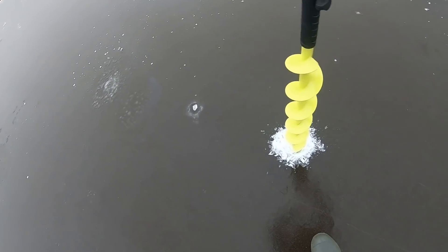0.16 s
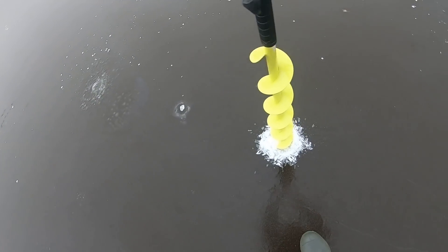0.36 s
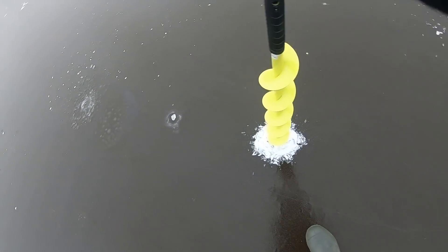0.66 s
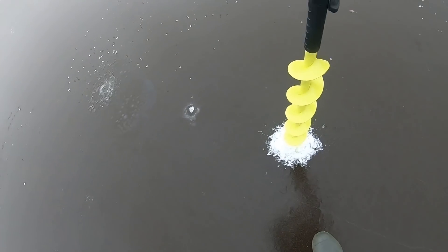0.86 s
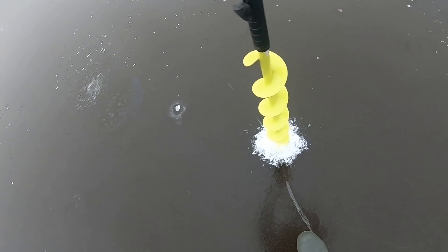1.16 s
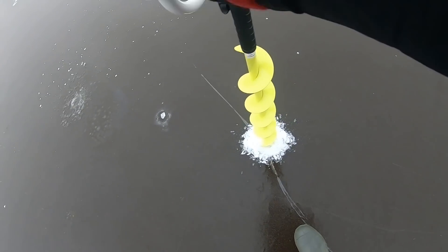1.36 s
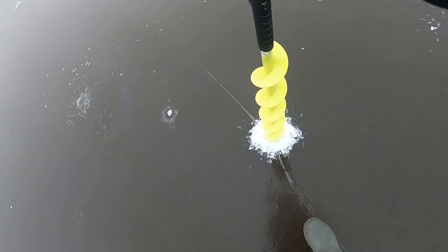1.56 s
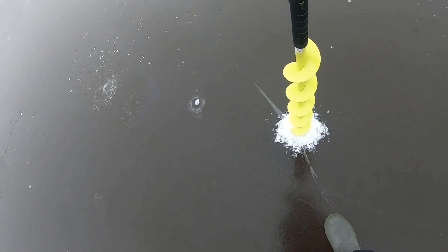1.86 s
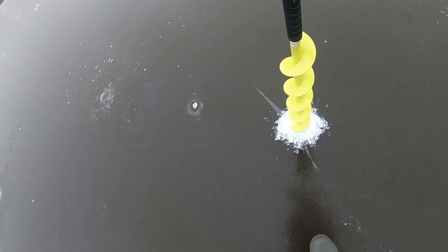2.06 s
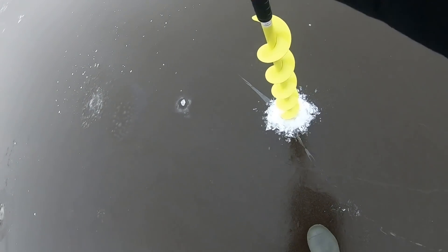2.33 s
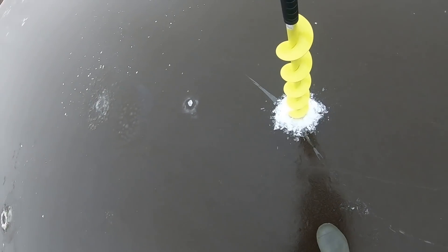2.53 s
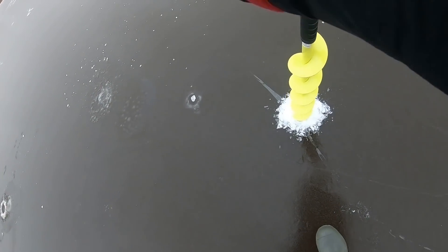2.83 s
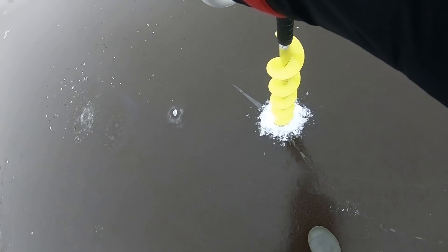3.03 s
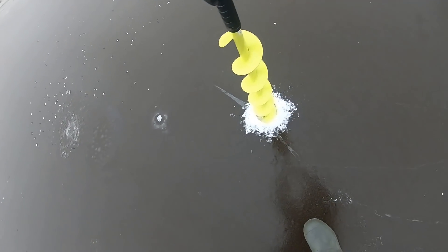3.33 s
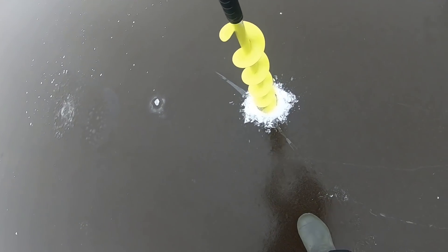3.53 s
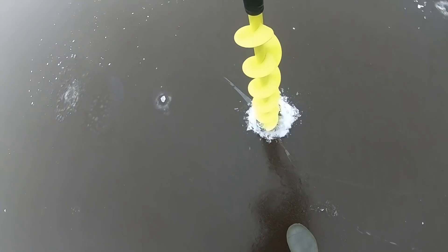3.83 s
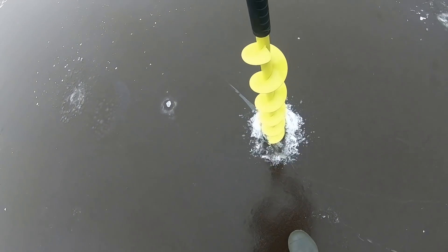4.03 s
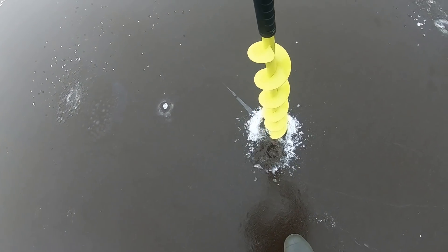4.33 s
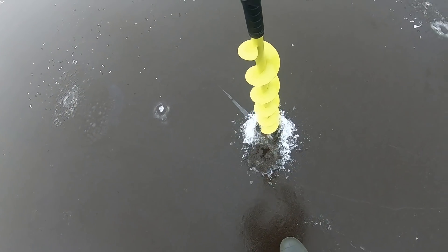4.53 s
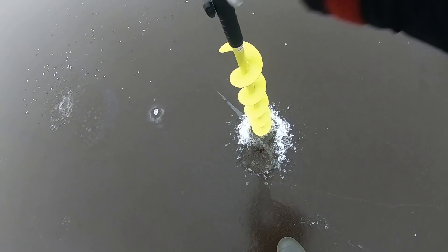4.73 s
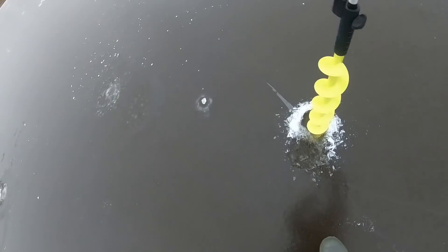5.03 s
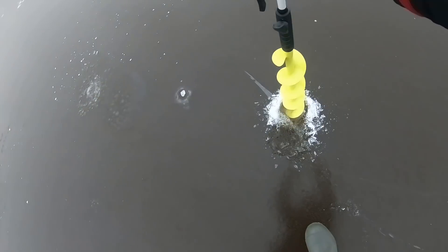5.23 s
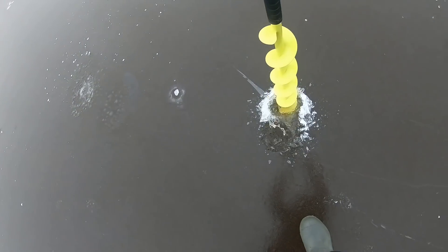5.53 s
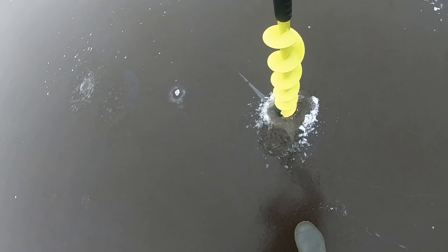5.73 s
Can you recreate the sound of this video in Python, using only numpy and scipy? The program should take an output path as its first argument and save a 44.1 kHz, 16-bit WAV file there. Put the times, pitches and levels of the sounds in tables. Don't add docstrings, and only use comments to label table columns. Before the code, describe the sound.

Steel auger blades scrape and shave ice in a steady gritty grind that pulses gently with the crank, then stops short. The tool rocks and knocks in the hole: chips crack, crunch and tick, with brief metallic rings. Activity thins around four seconds, then builds to a busy, loud finish. Dry open outdoor place, no echo, low clothing rumble and soft thumps, very faint hiss, one enclosed microphone nearby.

```python
import sys
import numpy as np
from scipy import signal
from scipy.io import wavfile
from scipy.ndimage import uniform_filter1d

SR = 44100
rng = np.random.default_rng(int(sys.argv[2]) if len(sys.argv) > 2 else 0)


def natural_amplitude(level_db):
    exponent = np.asarray(level_db, float) / 20
    return 10 ** exponent


def log_audio(samples):
    frames = np.atleast_2d(samples).T
    limited = np.clip(frames, -1, 1)
    pcm = np.round(limited * 32767).astype(np.int16)
    wavfile.write(sys.argv[1], SR, pcm)


N = 259296

# t/s, pressure as sheet level/dB, singing blade level/dB
DRILLING = [
    (0.02, -24.5, -38),
    (0.2, -28, -45.5),
    (0.4, -24, -48),
    (0.55, -25, -46.5),
    (0.85, -25, -35.5),
    (1.03, -24.5, -35),
    (1.15, -24.5, -49),
    (1.36, -26, -50),
    (1.5, -29.5, -38),
]
# t/s, peak/dB, chip pitch f/Hz, steel share/dB, steel pitch f/Hz
SNAPS = [(0.072, -28, 980, -23, 2660), (0.473, -10.5, 1240, -5, 5330), (0.614, -8, 980, -10, 2860),
         (0.814, -12, 1420, -40, 2580), (0.984, -13, 875, 0, 3200), (1.198, -7.5, 1130, -12, 4720),
         (1.285, -13, 1500, -4, 4500), (1.695, -16.5, 1070, -23, 6030), (2.483, -12, 1970, 4.5, 6100),
         (2.576, -21.5, 1500, -4.5, 2870), (2.757, -25, 880, -5, 6000), (2.893, -15.5, 1500, -1.5, 6000),
         (3.172, -22, 2000, -16, 3000), (3.545, -35.5, 900, 4, 5500), (3.662, -15, 2250, 2, 4360),
         (4.211, -41, 590, -9, 3870), (4.465, -49.5, 607, 10, 5630), (4.933, -14, 790, -16, 2520),
         (5.25, -23.5, 1560, -8, 3770), (5.645, -18.5, 1620, -1.5, 2750)]
CRUNCHES = [(1.609, -24, 603, -9.5, 4280), (1.651, -25.5, 674, -6, 2700), (1.639, -28, 1670, -12, 4500),
            (1.928, -34, 1150, -29, 2900), (2.017, -22.5, 1650, -14, 3150), (2.594, -18, 1233, -8.5, 2570),
            (2.682, -34, 1500, 8.5, 5540), (2.916, -13, 1560, -22, 3630), (3.038, -13, 1346, -6, 3740),
            (3.1, -22, 1170, -15, 5830), (3.493, -33.5, 820, -6.5, 5500), (3.602, -36, 600, 3, 2300),
            (4.44, -34, 1810, -13, 5700), (4.665, -19, 1500, -15, 2590), (4.888, -12, 1023, -12, 2560),
            (4.919, -31, 746, 10.5, 2830), (5.163, -12.5, 1190, -7.5, 4500), (5.333, -8, 1780, -10.5, 4370),
            (5.389, -18, 1450, -7.5, 2570), (5.427, -22.5, 1730, -10, 4500),
            (5.527, -8.5, 1570, -8.5, 4770), (5.594, -25, 1500, -26, 2680), (5.685, -27.5, 860, 7.5, 4500),
            (5.795, -12.5, 1970, -3.5, 3180)]
CRUSHES = [(1.708, -14.5, 2134, -4.5, 2870), (1.953, -21, 910, -17, 3330), (1.979, -21, 1044, -6, 6200),
           (2.385, -22.5, 696, -14, 2820), (2.441, -21.5, 1055, -23, 2760), (2.48, -11.5, 1770, -10, 3070),
           (2.84, -37, 620, 1, 5800), (2.938, -21.5, 1560, -10, 4030), (3.07, -28.5, 1110, -4, 6110),
           (3.308, -24, 1210, -10.5, 2420), (3.711, -13.5, 2090, -1.5, 4280),
           (4.588, -31, 1980, -4.5, 6100), (4.721, -29.5, 1230, -3, 4200), (4.752, -14, 774, -34, 4660),
           (4.835, -21, 2160, -13, 2620), (5.047, -21, 1286, -22, 2820), (5.081, -22.5, 1676, -7, 2760),
           (5.15, -16.5, 1910, -8, 6010), (5.184, -21, 1040, -2.5, 2450), (5.316, -27, 1510, 1, 6060),
           (5.449, -8.5, 864, -12.5, 2420), (5.617, -16.5, 1650, -11, 5500), (5.705, -12.5, 1140, -4, 4250),
           (5.769, -13.5, 1420, -0.5, 5030)]
# t/s, peak/dB, pitch f/Hz
TICKS = [(1.545, -28, 703), (1.578, -34, 716), (1.696, -17, 1150), (1.714, -15, 2180), (1.766, -36, 805),
         (1.796, -43, 818), (1.952, -26, 896), (1.979, -26, 980), (2.404, -26, 1250), (2.441, -29, 1220),
         (2.456, -19, 1000), (2.492, -16.5, 2680), (2.502, -17, 2660), (2.577, -25, 1520),
         (2.595, -21, 1160), (2.683, -22, 5500), (2.711, -33, 1170), (2.76, -26, 861), (2.792, -40, 818),
         (2.834, -27, 6370), (2.888, -19, 6030), (2.893, -8.5, 5650), (2.917, -17, 1580),
         (2.945, -22, 1560), (3.019, -29.5, 2130), (3.039, -15, 1250), (3.046, -26, 1230),
         (3.076, -29, 1130), (3.601, -34, 1820), (3.679, -19, 1020), (3.699, -17, 4350), (4.749, -29, 727),
         (4.762, -21, 1470), (4.834, -22, 2130), (4.921, -11, 2840), (5.315, -25, 1460), (5.335, -14, 2030),
         (5.393, -24, 1460), (5.449, -16.5, 870), (5.461, -13, 780), (5.471, -27, 807), (5.536, -4, 1590),
         (5.625, -23, 1570), (5.652, -18, 1610), (5.685, -24, 4530), (5.715, -15, 4590), (5.727, -15, 1200),
         (5.768, -17, 1400), (5.785, -11, 861), (5.802, -25, 1030)]
# t/s, f/Hz, level/dB, length/s, glide/octaves
PINGS = [(1.7, 900, -38, 0.004, -0.16), (1.579, 900, -35.5, 0.0036, -0.42),
         (1.765, 944, -38, 0.0049, -0.53), (1.863, 890, -39, 0.0026, -0.3),
         (1.975, 1014, -26.5, 0.00607, -1), (2.482, 5460, -24, 0.012, -0.0075),
         (5.795, 5440, -33.5, 0.0091, .001), (2.479, 2680, -23, 0.016, -.005),
         (2.803, 2150, -54.5, 0.031, .01), (3.724, 2150, -27.5, 0.013, -0.048),
         (3.716, 1490, -29.5, 0.01, -0.044), (4.357, 390, -42, 0.0056, -0.31),
         (5.6, 1200, -47, 0.0336, 0.37), (5.358, 1325, -35, 0.0085, 0.018),
         (5.455, 710, -34.5, 0.0125, -0.17), (5.541, 645, -25.5, 0.0088, 0.16),
         (5.608, 1400, -30.5, 0.025, 0.033), (5.706, 1048, -31.5, 0.042, 0.64),
         (5.787, 820, -28.5, 0.01, 0.1), (5.335, 1600, -28.5, 0.0088, .001),
         (5.536, 2900, -27, 0.0074, .001), (5.801, 3450, -35, 0.015, -.03),
         (5.534, 5000, -27.5, 0.007, .001), (5.533, 1600, -24, 0.0063, -0.028),
         (5.395, 2700, -42, .012, .001), (5.59, 1520, -38, 0.017, .02), (2.63, 2500, -47, .012, 0.056),
         (2.745, 5900, -38, .008, 0.31), (2.49, 7500, -41, 0.0066, 0.34), (2.485, 1900, -33, 0.01, .001),
         (5.713, 4500, -31, 0.0045, .001), (2.474, 5450, -30, 0.0068, .001)]
# t/s, peak/dB, bright above peak/dB, dust above peak/dB, slide time/s
SLIDES = [(1.515, -33.5, -6.5, -23, 0.031), (1.678, -41, -3.5, -17, 0.051), (1.97, -44, -6.5, -26, 0.074),
          (2.08, -49, 1.5, -13, 0.1), (2.256, -45.5, -2.5, -20, 0.08), (2.461, -35, 1.5, -37, 0.036),
          (2.6, -41, -2, -21, 0.078), (2.73, -42, 0, -15, 0.056), (2.85, -47, 1, -10, 0.032),
          (2.916, -43.5, 9, -5, 0.033), (3.08, -44.5, 2.5, -18, 0.046), (3.17, -45.5, -1, -14, 0.07),
          (3.55, -55.5, -0.5, -12, 0.44), (3.674, -36, -2.5, -32, 0.065), (3.9, -54.5, -1, -7.5, 0.24),
          (4.07, -61, 12, -5, 0.063), (4.41, -58.5, 1, -31, 0.052), (4.63, -52.5, 1, -20, 0.053),
          (4.86, -37.5, -0.5, -22, 0.13), (4.98, -49, -4, -11, 0.15), (5.18, -43.5, -5, -39, 0.079),
          (5.6, -43.5, 0, -21, 0.28), (5.74, -37, -10, -50, 0.16)]
# t/s, deep swell/dB, firm part above it/dB, swell time/s
RUSTLES = [(0.0, -24, -1, 0.015), (0.15, -39, -6, 0.18), (0.36, -36.5, -2, 0.1), (0.62, -56.5, 16.5, 0.75),
           (0.86, -37, -0.5, 0.099), (1.25, -47, 9, 0.32), (1.45, -42, 3, 0.034), (1.78, -38, -8, 0.1),
           (2.0, -55.5, 17, 0.082), (2.27, -53, 8.5, 0.18), (2.5, -33, -5, 0.096), (2.86, -40, 0, 0.099),
           (3.09, -37, -8, 0.054), (3.66, -40, 3.5, 0.12), (3.98, -52.5, 8, 0.11), (4.29, -38.5, -25, 0.11),
           (4.46, -38, -36, 0.037), (4.88, -42.5, 8.5, 0.15), (4.96, -41.5, -21, 0.12),
           (5.361, -42.5, -0.5, 0.028), (5.53, -53.5, 14, 0.09), (5.64, -40.5, 3.5, 0.11),
           (5.76, -44.5, 6.5, 0.089), (5.88, -38, -17, 0.042), (3.42, -41, 1, 0.072), (3.3, -54, 11.5, 0.1)]
# t/s, peak/dB, f/Hz
THUMPS = [(0.354, -30, 91.4), (0.844, -26.5, 75), (1.409, -29.5, 138), (1.751, -28.5, 76),
          (1.799, -28.5, 127), (1.962, -19.5, 226), (2.215, -34.5, 135), (2.468, -32.5, 212),
          (2.516, -33, 129), (2.836, -39, 56.5), (2.968, -35.5, 48.3), (3.06, -36, 66), (3.549, -32, 167),
          (4.239, -37.5, 59.3), (4.277, -48, 74.5), (4.432, -36, 66.4), (4.828, -29.5, 185),
          (5.433, -26, 220), (5.507, -26.5, 310), (5.622, -34, 162)]
# f/Hz, width/Hz, level/dB
ICE_MODES = [(437, 48, -8), (637, 290, -8.5), (1000, 149, 0), (1230, 104, 0.5), (1500, 146, -1),
             (1740, 240, -7.5), (2043, 310, -9)]
# f/Hz, width/Hz, level/dB
STEEL_MODES = [(2030, 35, -9), (2480, 35, -12), (2668, 26, -3), (2970, 50, -5), (3090, 25, -8),
               (4030, 200, -13), (4500, 120, -7), (4980, 40, -14), (5440, 80, -11), (5725, 35, -14),
               (5880, 45, -10), (6130, 90, -19), (6400, 60, -21), (7500, 60, -28)]
# f/Hz, density/dB
SCRAPE_SPECTRUM = [(1700, 24), (2150, -3.5), (2900, 22.5), (3500, -13), (4400, 12.5), (5200, 10),
                   (5900, 14.5), (6500, -14), (7200, -48), (8500, -57), (10500, -49), (12000, -70)]
# f/Hz, density/dB
CHIP_SPECTRUM = [(280, -36), (400, 0), (800, -1), (1450, 2), (2300, -4), (3300, -6.5), (4300, -3.5),
                 (5700, -0.5), (6600, -7), (7500, -26), (9700, -44)]
# f/Hz, density/dB
RUMBLE_SPECTRUM = [(12, -20), (20, -2), (54, -6.5), (168, -6), (353, -12.5), (528, -19.5), (700, -22.5),
                   (910, -46), (1540, -120)]

FRACTURES_PER_S = 7000
BLADE_HZ, BLADE_WIDTH_HZ = 2668, 26
TURN_S, HEAVIEST_S, TURN_DB = 0.394, 0.41, 1.5
STOP_DB_PER_S = 746
STEEL_DB, STEEL_PER_PRESSURE, STEEL_PER_BLADE = -35.5, 0.37, 0.051
BLADE_DB, DRILL_DUST_DB = 2, -61.5
SNAP_S, CRUNCH_S, CRUSH_S = 0.0062, 0.014, 0.025
FIRST_CRACK, ONSET_SHARE, FADE_POWER = 8.6, 0.71, 1.85
NEAR_MODE_DB = 15
SPLINTER_DB, SPLINTER_SLOPE, SPLINTER_DB_PER_OCTAVE = -29, 1.5, 28
TICK_S, TICK_WIDTH, TICK_BARE = 0.002, 0.19, 0.52
SWELL_ROUNDNESS = 1.25
REST_DULL_DB, REST_BRIGHT_DB, REST_DUST_DB = -70.5, -66, -92
STILL_DEEP_DB, STILL_BODY_DB = -51.5, -52.5


def grind():
    pressure_db, free_db, halt_db = drilling()
    ice_db = pressure_db + halt_db
    blade_db = BLADE_DB + free_db + halt_db
    steel_db = STEEL_DB + STEEL_PER_PRESSURE * (pressure_db + 26) + STEEL_PER_BLADE * (free_db + 36.5) + halt_db
    waves = natural_amplitude(1.3 * drift(70) + 0.2 * drift(20))
    bite, chatter, shave = fractures(spread_db=2.6, size=(3, N)) * waves
    ice_wander = [0.9 * drift(10) for mode in ICE_MODES]
    steel_wander = [2.5 * drift(10) for mode in STEEL_MODES]
    ice = body(bite, ICE_MODES, ice_wander)
    scrape = coloured(shave, SCRAPE_SPECTRUM, patchy_db=1.2)
    steel_extra = [w - 7 * (hz == BLADE_HZ) for w, (hz, *_) in zip(steel_wander, STEEL_MODES)]
    rings = played(lambda x: body(x, STEEL_MODES, steel_extra), chatter, steel_db - 0.5)
    sing_db = blade_db - 0.5 + 0.24 * steel_wander[2] + 2.8 * drift(25)
    blade = played(lambda x: resonate(resonate(x, BLADE_HZ, BLADE_WIDTH_HZ), BLADE_HZ, 120),
                   chatter[::-1], sing_db)
    return at_level(ice, ice_db + 0.7) + rings + blade + at_level(scrape, steel_db - 2.5)


def drilling():
    t = np.arange(N) / SR
    s, pressure, free = np.transpose(DRILLING)
    turn_db = TURN_DB * np.cos(2 * np.pi * (t - HEAVIEST_S) / TURN_S)
    halt_db = -STOP_DB_PER_S * (t - s[-1]).clip(0, 1)
    return np.interp(t, s, pressure) + turn_db, np.interp(t, s, free), halt_db


def breaking_ice():
    s, db, chip_hz, share_db, hz = np.transpose(SNAPS + CRUNCHES + CRUSHES)[:, :, None]
    counts = [len(SNAPS), len(CRUNCHES), len(CRUSHES)]
    length = np.repeat([SNAP_S, CRUNCH_S, CRUSH_S], counts)[:, None]
    t = np.arange(5000) / SR
    cracks = fractures(spread_db=3, size=(len(s), len(t))) + FIRST_CRACK * (t == 0)
    fade = np.exp(-(t / length) ** FADE_POWER) + 0.16 * np.exp(-t / (1.75 * length))
    bursts = cracks * fade * np.minimum(1, ONSET_SHARE + t / (0.35 * length))

    chips = np.array([resonate(b, f, 0.064 * f) for b, f in zip(bursts, chip_hz[:, 0])])
    chips = chips + 0.45 * body(bursts, ICE_MODES)
    octaves_off = np.log2(np.array(STEEL_MODES)[:, 0] / hz)
    near_db = NEAR_MODE_DB * np.exp(-(octaves_off / 0.096) ** 2)
    near_db = near_db + rng.normal(0, 3.2, near_db.shape)
    steel = body(bursts, STEEL_MODES, near_db.T[:, :, None]) + 0.057 * coloured(bursts, SCRAPE_SPECTRUM)
    splinters = band_pass(bursts * np.exp(-t / (0.52 * length)), 2, 6500, 10000)
    splinter_db = SPLINTER_SLOPE * share_db + SPLINTER_DB + SPLINTER_DB_PER_OCTAVE * np.log2(hz / 4000)
    mix = natural_amplitude(-5.5) * unit_peak(chips) + natural_amplitude(share_db) * unit_peak(steel)
    mix = mix + natural_amplitude(splinter_db) * unit_peak(splinters)
    return lay(s[:, 0], natural_amplitude(db - 3) * mix)


def ticks():
    s, db, hz = np.transpose(TICKS)[:, :, None]
    t = np.arange(1500) / SR
    cracks = (rng.standard_normal((len(s), len(t))) + 3.6 * (t == 0)) * np.exp(-t / TICK_S)
    rung = np.array([resonate(c, f, TICK_WIDTH * f) for c, f in zip(cracks, hz[:, 0])])
    bare = coloured(cracks, CHIP_SPECTRUM)
    return lay(s[:, 0], natural_amplitude(db - 5.5) * (unit_peak(rung) + TICK_BARE * unit_peak(bare)))


def pings():
    s, hz, db, length, glide = np.transpose(PINGS)[:, :, None]
    t = np.arange(6000) / SR
    glide = np.where(hz > 1800, glide.clip(-0.05, 0.01), glide)
    pitch_hz = hz * 2 ** (glide * np.minimum(t / length / 2, 1.5))
    phase = 2 * np.pi * np.cumsum(pitch_hz, axis=1) / SR
    beats = uniform_filter1d(rng.standard_normal((len(s), len(t))), size=110)
    rough = 1 + 5.4 * np.minimum(hz / 2600, 1) ** 2 * beats
    envelope = (t / length) ** 0.63 * np.exp(-t / length)
    return lay(s[:, 0], natural_amplitude(db + 8.5) * rough * np.sin(phase) * envelope)


def sliding_chips():
    dull_db, bright_db, dust_db = sliding()
    grit, chatter = fractures(spread_db=1.5, size=(2, N)) * natural_amplitude(2.3 * drift(36))
    dull, bright = split(coloured(grit, CHIP_SPECTRUM, patchy_db=3), 2300)
    rings = played(lambda x: body(x, STEEL_MODES), chatter, bright_db - 7)
    dust = band_pass(grit, 2, 6800, 9500)
    chips = at_level(dull, dull_db + 0.9) + at_level(bright, bright_db - 4.4)
    return chips + rings + at_level(dust, dust_db - 8)


def sliding():
    s, db, bright_db, dust_db, length = np.transpose(SLIDES)
    dull, bright, dust = swells(s, length, db, db + bright_db, db + dust_db)
    drill_dust = DRILL_DUST_DB + drilling()[2]
    return over(REST_DULL_DB, dull), over(REST_BRIGHT_DB, bright), over(over(REST_DUST_DB, dust), drill_dust)


def rumble():
    noise = coloured(rng.standard_normal(N), RUMBLE_SPECTRUM) * natural_amplitude(3.4 * drift(29.3))
    deep, firm = split(noise, 110)
    s, db, firm_db, length = np.transpose(RUSTLES)
    deep_db, body_db = swells(s, length, db, db + firm_db)
    deep = at_level(deep, over(STILL_DEEP_DB, deep_db) + 0.5)
    firm = at_level(firm, over(STILL_BODY_DB, body_db) + 0.5)
    s, db, hz = np.transpose(THUMPS)[:, :, None]
    t = np.arange(4000) / SR
    pushes = -natural_amplitude(db + 3.5) * np.sin(2 * np.pi * hz * t) * np.exp(-t * hz / 2.1)
    return deep + firm + lay(s[:, 0] + 0.01594, pushes)


def top_hiss(near):
    bright = band_pass(near, 2, 6800, 10000)
    bed = natural_amplitude(sliding()[2] - 9.5 + 2.2 * drift(25))
    level = bed + natural_amplitude(-15.5) * np.sqrt(uniform_filter1d(bright ** 2, size=40).clip(0))
    band = band_pass(rng.standard_normal((2, N)), 7, 11900, 15300)
    band = low_pass(band, 1, 9000)
    balance_db = np.array([[0.6], [-0.6]])
    return level * at_level(band, balance_db)


def fractures(spread_db, size):
    strength = natural_amplitude(spread_db * np.minimum(rng.exponential(1, size), 5)) * rng.standard_normal(size)
    cracks = strength * (rng.random(size) < FRACTURES_PER_S / SR)
    return cracks / rms(cracks)


def resonate(x, hz, width):
    r = np.exp(-np.pi * width / SR)
    poles = [1, -2 * r * np.cos(2 * np.pi * hz / SR), r * r]
    return signal.lfilter([(1 - r * r) / 2, 0, (r * r - 1) / 2], poles, x + 1e-18)


def body(x, modes, extra_db=None):
    if extra_db is None:
        extra_db = np.zeros(len(modes))
    out = 0
    for k, ((hz, width, db), more) in enumerate(zip(modes, extra_db)):
        out = out + (-1) ** k * natural_amplitude(db + more) * resonate(x, hz, width)
    return out


def played(filt, drive, level_db):
    return filt(drive * natural_amplitude(level_db)) / rms(filt(drive))


def coloured(x, spectrum, patchy_db=0):
    hz, db = np.transpose(spectrum)
    edges = hz[0] * 2 ** np.arange(0, np.log2(hz[-1] / hz[0]), 1 / 3)
    levels_db = np.interp(np.log(edges[:-1] * edges[1:]) / 2, np.log(hz), db)
    out = 0
    for k, (low, high, level_db) in enumerate(zip(edges, edges[1:], levels_db)):
        if patchy_db:
            level_db = level_db + patchy_db * drift(4.9)
        out = out + (-1) ** k * natural_amplitude(level_db) * band_pass(x, 2, low, high)
    return out


def drift(rate):
    r = np.exp(-40 * np.pi * rate / SR)
    slow = signal.lfilter([1], [1, -2 * r, r * r], rng.standard_normal(N // 20 + 3002))[3000:]
    return np.interp(np.arange(N) / 20, np.arange(len(slow)), slow / rms(slow))


def swells(s, length, *levels_db):
    steps = np.arange(0, N + 64, 64)
    distance = np.abs(steps / SR - s[:, None]) / length[:, None].clip(0.005)
    shape = np.exp(-2 * distance ** SWELL_ROUNDNESS)
    curves = [10 * np.log10(natural_amplitude(db) ** 2 @ shape + 1e-20) for db in levels_db]
    return [np.interp(np.arange(N), steps, curve) for curve in curves]


def over(floor_db, level_db):
    return 10 * np.log10(natural_amplitude(floor_db) ** 2 + natural_amplitude(level_db) ** 2)


def lay(times, sounds):
    out = np.zeros(N + len(sounds[0]))
    for s, sound in zip(times, sounds):
        out[round(s * SR):][:len(sound)] += sound
    return out[:N]


def rms(x):
    return np.sqrt(np.mean(x ** 2) + 1e-20)


def at_level(x, db):
    return natural_amplitude(db) * x / rms(x)


def unit_peak(x):
    return x / np.abs(x).max(axis=1, keepdims=True)


def band_pass(x, order, low_hz, high_hz):
    return signal.sosfilt(signal.butter(order, [low_hz, high_hz], "band", fs=SR, output="sos"), x)


def low_pass(x, order, hz):
    return signal.sosfilt(signal.butter(order, hz, fs=SR, output="sos"), x)


def split(x, hz):
    return low_pass(x, 3, hz), signal.sosfilt(signal.butter(3, hz, "high", fs=SR, output="sos"), x)


def scene():
    near = grind() + sliding_chips() + breaking_ice() + pings()
    sharp = ticks()
    housed = low_pass(near + sharp, 9, 9000)
    return housed + rumble() + top_hiss(near + 1.1 * sharp)


def band_limit(x):
    return signal.sosfilt(signal.butter(12, 15830, fs=SR, output="sos"), x)


def record(dry):
    slack = natural_amplitude(-30) * np.abs(dry) * rng.standard_normal(N) * [[1], [-1]]
    slack = low_pass(slack, 4, 6500)
    dry = signal.sosfilt(signal.cheby2(10, 50, 16000, fs=SR, output="sos"), dry)
    return band_limit(dry + slack)


dry = scene()
out = record(dry)
log_audio(out)
```